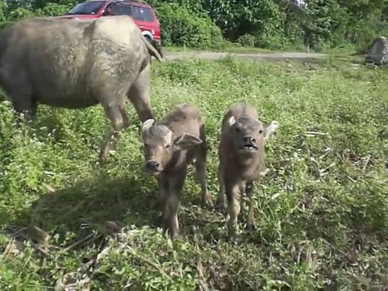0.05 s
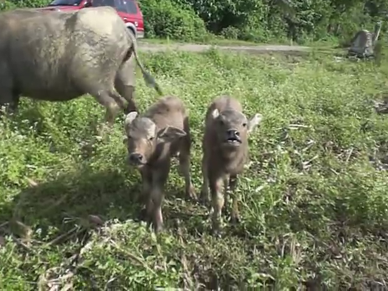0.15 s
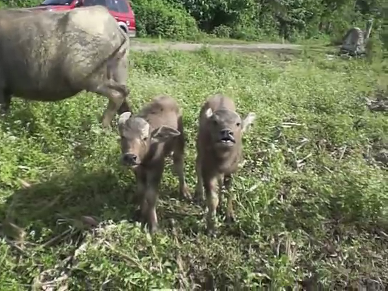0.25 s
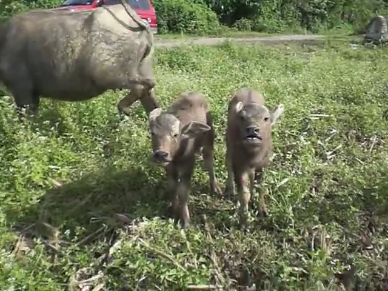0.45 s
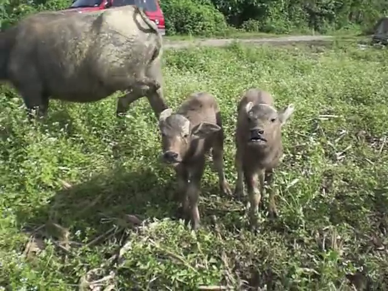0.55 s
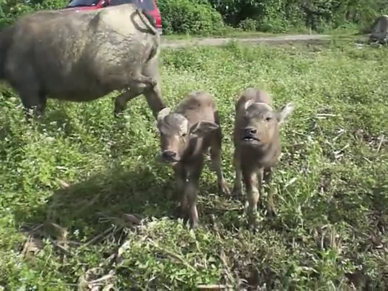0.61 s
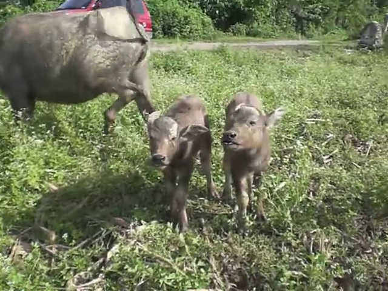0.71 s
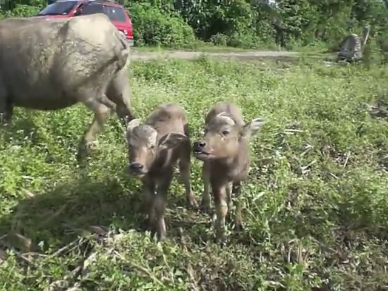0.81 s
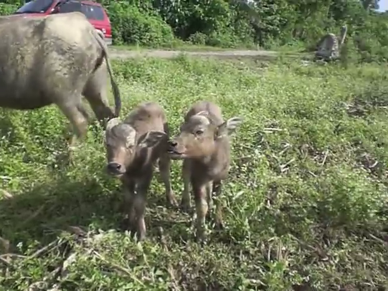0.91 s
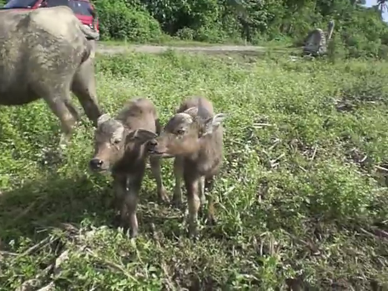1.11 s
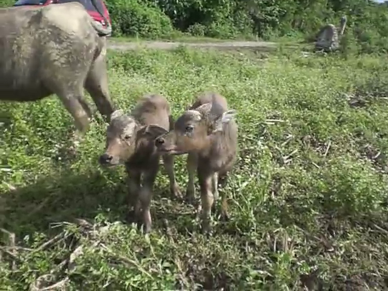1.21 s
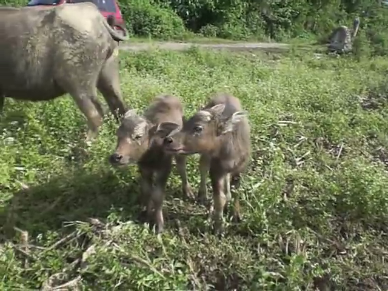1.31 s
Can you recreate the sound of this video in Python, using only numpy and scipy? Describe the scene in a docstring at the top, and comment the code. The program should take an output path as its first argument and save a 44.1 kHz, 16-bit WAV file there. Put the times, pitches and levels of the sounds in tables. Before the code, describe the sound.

Grass swishes softly and a few dry stalks snap as buffaloes shift their legs in an open field. Small birds chirp over a steady insect hiss, and a light breeze bumps the microphone, mostly in the second half.

```python
"""Buffaloes in a sunny field.

Buffaloes shift about: grass swishes against their legs in countless tiny contacts, and a few dry stalks snap,
each a click plus splinters. Small birds whistle quick falling notes over a steady noise band of distant chips
and insects. A light breeze rumbles on the microphone and hits it with a few soft, low buffets, each a suction
and a push."""
import sys
import numpy as np
from scipy import signal
from scipy.fft import rfft, irfft
from scipy.io import wavfile
from scipy.ndimage import uniform_filter1d

SR = 44100
rng = np.random.default_rng(int(sys.argv[2]) if len(sys.argv) > 2 else 0)


def master_out(mix):
    """Clip the mix to full scale and print it as 16-bit PCM to the path in sys.argv[1]."""
    frames = np.transpose(np.atleast_2d(mix))
    ceiling = np.clip(frames, -1, 1)
    pcm = np.round(ceiling * 32767).astype(np.int16)
    wavfile.write(sys.argv[1], SR, pcm)


N = 59535
T = np.arange(N) / SR

AIR_SPECTRUM = [(100, 8.5), (400, 3.5), (700, 3), (1100, 3), (2000, -0.5), (4000, -4.5), (7500, -3),
                (12000, -3), (17000, -5.5)]  # open-air hiss (frequency [Hz], gain [dB])
CHORUS_SPECTRUM = [(3500, -37), (4600, -14.5), (5300, -2), (5800, 1), (6200, -9.5), (6800, -10),
                   (8600, -29.5), (9500, -10.5), (10200, -6.5), (11200, -24), (14000, -46.5)]  # far bird chips near 5.8 kHz and insects near 10 kHz (frequency [Hz], gain [dB])
WHINES = [(13183, -65.5), (14506, -68.5)]  # faint thin tones (frequency [Hz], level [dB])

BREEZE_LEVELS = [(0, -46), (.16, -54.5), (.3, -52), (.44, -51), (.55, -49), (.62, -55.5), (.7, -37.5),
                 (.8, -49.5), (.9, -45), (1.05, -46), (1.15, -52), (1.23, -48), (1.35, -57)]  # breeze strength (time [s], level [dB])
RUMBLE_SPECTRUM = [(20, -36), (40, -7.5), (70, 2), (110, -1), (200, -4.5), (320, -13.5), (500, -35.5),
                   (1200, -51.5)]  # breeze on the microphone (frequency [Hz], gain [dB])
# wind buffets (time [s], suction level [dB], suction width [s], push lag [s],
# push re suction [dB], push width [s])
BUFFETS = [(0.4557, -35.5, 0.00246, 0.011, -7.5, 0.003), (0.4745, -29.5, 0.00281, 0.0082, -13, 0.00134),
           (.678, -25.5, 0.00156, -.0016, -1.5, 0.001187), (.7225, -17, .001, .009, 0, .0016),
           (0.7454, -31, 0.00115, 0.0074, -4.5, .0014), (.928, -20.5, 0.00218, .0156, -3, 0.001464),
           (.978, -38, 0.00175, -0.0055, 11, 0.00187), (1.0663, -39.5, 0.00124, 0.0074, 5.5, 0.00258)]
WAKE_SPECTRUM = [(25, -22.5), (60, -6), (170, -2.5), (300, -8), (500, -20.5), (900, -31), (3000, -69.5)]  # turbulence around a buffet (frequency [Hz], gain [dB])

BIRD_SWEEPS = [(.608, -57), (.638, -44), (.671, -43), (0.8134, -45), (.847, -42), (0.875, -44),
               (1.020, -46), (1.053, -45.5), (1.0832, -42), (1.257, -45), (1.289, -41), (1.320, -41.5)]  # longer falling notes (peak time [s], level [dB])
BIRD_CHIPS = [(.002, -42), (.011, -38), (0.054, -44.5), (.557, -41), (.568, -42.5), (0.635, -39.5),
              (0.644, -42), (.708, -41), (0.721, -35.5), (.726, -51), (0.783, -36.5), (.797, -40.5),
              (0.86, -38), (.872, -38.5), (.935, -49.5), (.946, -37.5), (1.012, -37), (1.024, -43),
              (1.048, -44), (1.091, -38.5), (1.101, -43.5), (1.31, -49)]  # short high notes (peak time [s], level [dB])

SWISHES = [(.08, -43.5, 0.0085, 0.062), (.135, -44.5, 0.0165, 0.056), (.205, -41.5, 0.035, 0.162),
           (.256, -42.5, 0.0129, 0.087), (.55, -44, 0.051, 0.0526), (.79, -47, 0.0595, 0.172),
           (.922, -39.5, 0.0069, 0.016), (.941, -36, 0.0097, 0.0351)]  # grass against legs (peak time [s], level [dB], rise [s], decay [s])
SWISH_SPECTRUM = [(300, -22.5), (700, -5), (1400, -7.5), (3400, 1.5), (5000, 1.5), (7500, 0), (13000, 1.5),
                  (17000, 2)]  # bright swish (frequency [Hz], gain [dB])
RUSTLES = [(.11, -56, 0.029, 0.096), (.253, -58, 0.0407, 0.2), (.55, -51, 0.033, 0.074),
           (.62, -49, 0.0316, 0.0855)]  # trodden stalks (peak time [s], level [dB], rise [s], decay [s])
RUSTLE_SPECTRUM = [(300, -13.5), (700, 3.5), (1100, 4), (2000, 5), (3600, -5), (6000, -2.5), (16000, -29.5)]  # duller rustle (frequency [Hz], gain [dB])
SCRAPES = [(.26, -56.5, 0.029, 0.038), (.44, -52, 0.0238, 0.079), (1.322, -52, 0.0158, 0.0173)]  # scraping leaves (peak time [s], level [dB], rise [s], decay [s])
SCRAPE_SPECTRUM = [(1200, -20), (2500, -7.5), (3500, 4.5), (4400, -5.5), (6500, -27), (16000, -32)]  # light scrape (frequency [Hz], gain [dB])
SNAPS = [(.3862, -39, 0.0041), (.5748, -31.5, 0.00195), (1.2222, -37.5, 0.00139)]  # breaking stalks (time [s], level [dB], decay [s])
SNAP_SPECTRUM = [(300, -31.5), (800, -20.5), (1200, 3.5), (1900, 6), (2700, 3.5), (4000, 5.5), (6400, 2.5),
                 (7800, -10), (16000, -34.5)]  # dry snap (frequency [Hz], gain [dB])
TICKS = [(.061, -38.5, 0.0049), (.206, -32.5, 0.0032), (.25, -36, 0.0033), (.432, -43, 0.0025),
         (.9185, -23.5, 0.00107), (1.161, -36.5, 0.00182), (1.237, -38.5, 0.00216), (1.265, -42, 0.00184)]  # ticking grass blades (time [s], level [dB], decay [s])
TICK_SPECTRUM = [(500, -20), (2000, -6), (6000, -6.5), (10500, -1.5), (17000, -1)]  # crisp tick (frequency [Hz], gain [dB])


def undb(db):
    """Decibels to amplitude."""
    return 10 ** (np.asarray(db) / 20)


def colour(x, spectrum):
    """Filter by a spectrum table, keeping the power of white noise."""
    hz, db = np.array(spectrum).T
    bins_hz = np.arange(N + 1) * SR / (2 * N)
    gain = undb(np.interp(np.log(bins_hz + 1), np.log(hz), db))
    return irfft(rfft(x, 2 * N) * gain / np.sqrt(np.mean(gain ** 2)))[:N]


def noise(spectrum):
    """Coloured noise, rms 1."""
    x = colour(rng.standard_normal(N), spectrum)
    return x / x.std()


def drift(rate_hz):
    """Smooth random drift, standard deviation 1."""
    hold = int(SR / rate_hz)
    steps = np.repeat(rng.standard_normal(N // hold + 1), hold)
    x = uniform_filter1d(steps, hold)[:N]
    return x / x.std()


def swells(rows):
    """Power sum of envelopes: Gaussian rise, exponential fall."""
    power = np.zeros(N)
    for at_s, db, rise_s, decay_s in rows:
        before_s, after_s = np.minimum(T - at_s, 0), np.maximum(T - at_s, 0)
        power += (undb(db) * np.exp(-(before_s / rise_s) ** 2 / 2 - after_s / decay_s)) ** 2
    return np.sqrt(power)


def air():
    """Even open-air hiss and two thin, wavering whines."""
    whines = np.zeros(N)
    for hz, db in WHINES:
        pitch_hz = hz * (1 + 0.000297 * drift(rate_hz=30))
        whines += undb(db) * np.sqrt(2) * np.sin(2 * np.pi * np.cumsum(pitch_hz) / SR)
    return undb(-49.5) * noise(AIR_SPECTRUM) + whines


def chorus(level_db=-51.5, flicker_db=2.12):
    """Distant bird chips and insects merged into a shimmering band of treble noise."""
    return undb(level_db + flicker_db * drift(rate_hz=90)) * noise(CHORUS_SPECTRUM)


def eddy(at_s, width_s, spread=2.08, return_share=0.985):
    """Rounded pressure pulse inside a broader opposite swing, peak 1."""
    u = ((T - at_s) / width_s) ** 2
    swing = return_share / spread
    return (np.exp(-u) - swing * np.exp(-u / spread ** 2)) / (1 - swing)


def wind(wake_db=-15.5, wake_rise_s=0.006, wake_decay_s=0.019):
    """Breeze rumbles on the microphone; each buffet sucks, pushes and leaves turbulence."""
    buffets = sum(undb(db) * (undb(push_db) * eddy(at_s + lag_s, push_s) - eddy(at_s, suction_s))
                  for at_s, db, suction_s, lag_s, push_db, push_s in BUFFETS)
    wake = swells([(at_s, db + wake_db, wake_rise_s, wake_decay_s) for at_s, db, *_ in BUFFETS])
    breeze = undb(np.interp(T, *np.array(BREEZE_LEVELS).T))
    return buffets + wake * noise(WAKE_SPECTRUM) + breeze * noise(RUMBLE_SPECTRUM)


def whistle(at_s, hz, fall_hz_per_s, bend_s, width_s):
    """Bird note, slightly detuned at random: pitch drops fast, then more slowly."""
    offset_s = np.clip(T - at_s, -4 * width_s, 4 * width_s)
    centre_hz = hz * (1 + 0.011 * rng.standard_normal())
    pitch_hz = centre_hz + fall_hz_per_s * bend_s * (np.exp(-offset_s / bend_s) - 1)
    envelope = np.exp(-((T - at_s) / width_s) ** 2 / 2)
    return envelope * np.sin(2 * np.pi * np.cumsum(pitch_hz) / SR)


def birds(chip_hz=5813, far_per_s=60, far_db=-52.5, echo_db=-5.5, echo_decay_s=0.0248):
    """Near sweeps and chips plus random far chips, all scattered by bushes."""
    sweep = dict(fall_hz_per_s=57000, bend_s=0.024, width_s=0.0065)
    chip = dict(fall_hz_per_s=105000, bend_s=0.02, width_s=0.0022)
    calls = sum(undb(db) * whistle(at_s, hz=4814, **sweep) for at_s, db in BIRD_SWEEPS)
    calls += sum(undb(db) * whistle(at_s, chip_hz, **chip) for at_s, db in BIRD_CHIPS)
    bushes = rng.standard_normal(N) * np.exp(-T / echo_decay_s)
    for when, size, pitch in rng.random((int(far_per_s * N / SR), 3)):
        far_hz = chip_hz + 600 * (pitch - 0.5)
        calls += undb(far_db) * (0.5 + size) * whistle(when * N / SR, far_hz, **chip)
    echo = signal.fftconvolve(calls, bushes / np.linalg.norm(bushes))[:N]
    return calls + undb(echo_db) * echo


def brushing(rows, spectrum, grain_db):
    """Countless tiny blade contacts, swelling with each movement."""
    grains = rng.standard_normal(N) * undb(grain_db * rng.standard_normal(N))
    return colour(grains / grains.std() * swells(rows), spectrum)


def cracks(rows, spectrum, click_db):
    """Each break: one clean click, then splinters that die within milliseconds."""
    breaks = np.zeros(N)
    for at_s, db, decay_s in rows:
        click = undb(click_db) * (np.arange(N) == int(at_s * SR))
        splinters = rng.standard_normal(N) * (T >= at_s) * np.exp(-np.abs(T - at_s) / decay_s)
        breaks += undb(db) * (click + splinters)
    return colour(breaks, spectrum)


def buffaloes_in_grass():
    """Legs brush grass and leaves; stalks rustle and snap, blades tick."""
    swishes = brushing(SWISHES, SWISH_SPECTRUM, grain_db=4.5)
    rustles = brushing(RUSTLES, RUSTLE_SPECTRUM, grain_db=7)
    scrapes = brushing(SCRAPES, SCRAPE_SPECTRUM, grain_db=1.5)
    snaps = cracks(SNAPS, SNAP_SPECTRUM, click_db=16.5)
    ticks = cracks(TICKS, TICK_SPECTRUM, click_db=-3.5)
    return swishes + rustles + scrapes + snaps + ticks


def scene():
    """Mono mix."""
    return (wind() + buffaloes_in_grass() + air() + chorus() + birds())[None]


def record(dry):
    """Microphone: narrow treble notch, steep top cut."""
    notch_hz, top_hz = 7200, 17250
    notched = signal.lfilter(*signal.iirnotch(notch_hz, Q=18, fs=SR), dry)
    return signal.sosfilt(signal.ellip(10, 0.2, 70, top_hz, fs=SR, output="sos"), notched)


dry = scene()
out = record(dry)
master_out(out)
```